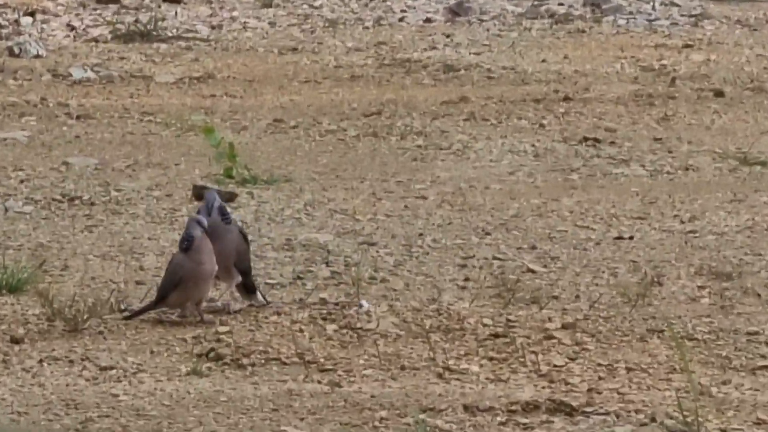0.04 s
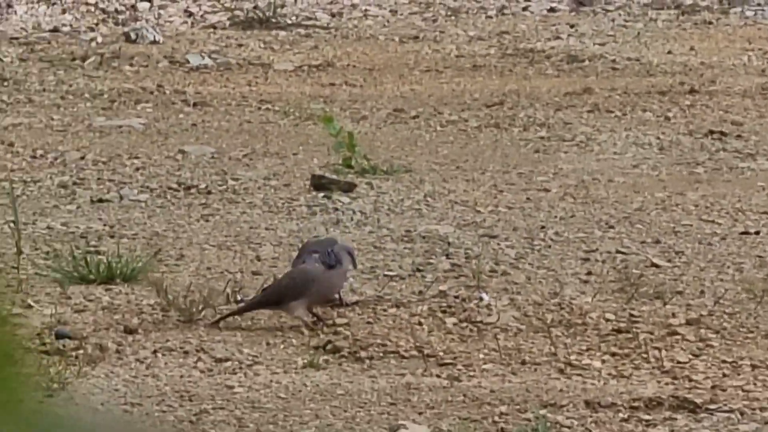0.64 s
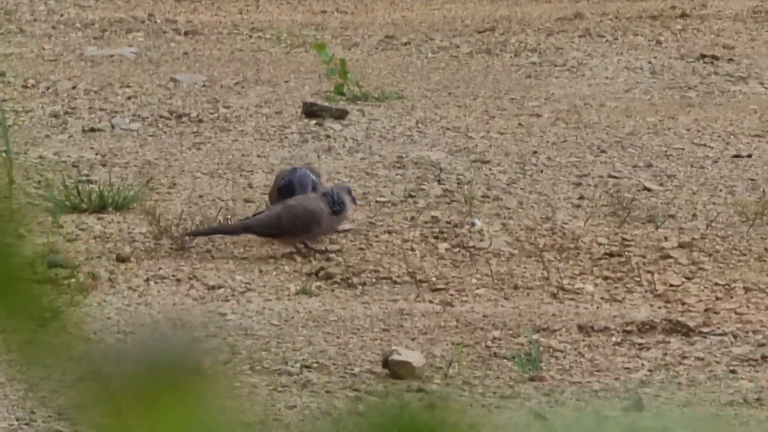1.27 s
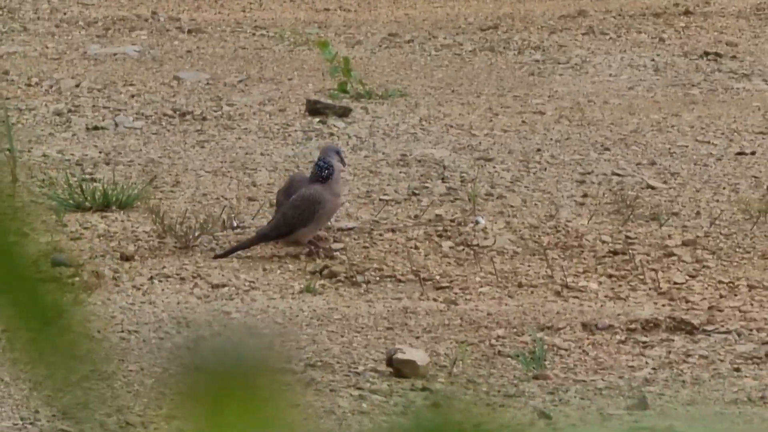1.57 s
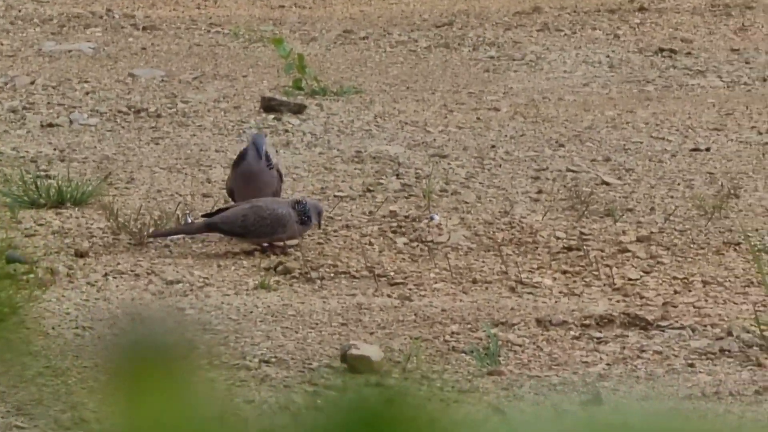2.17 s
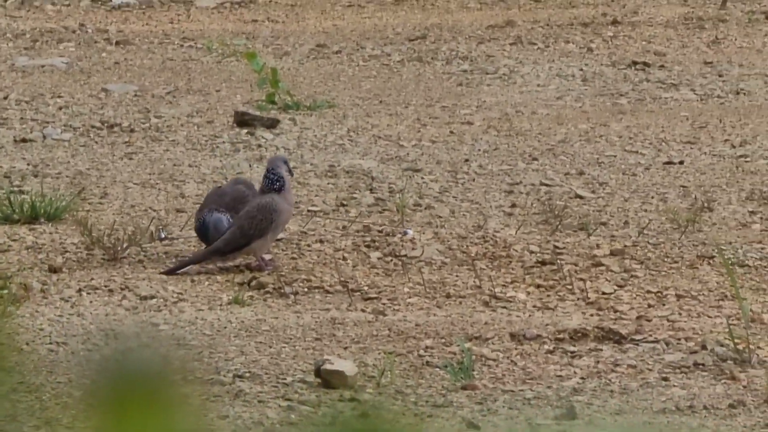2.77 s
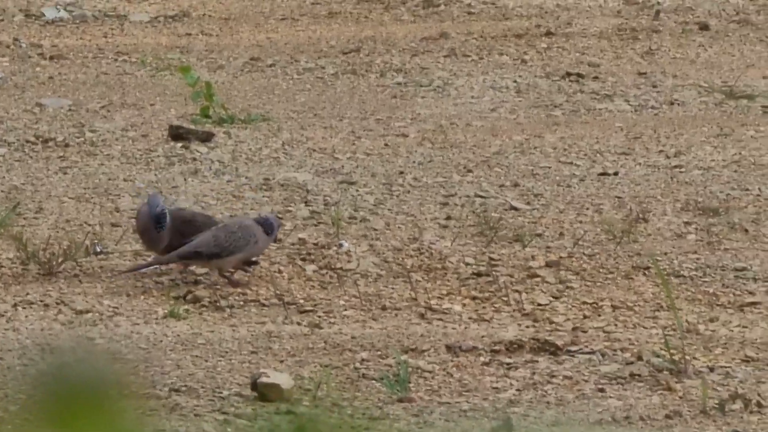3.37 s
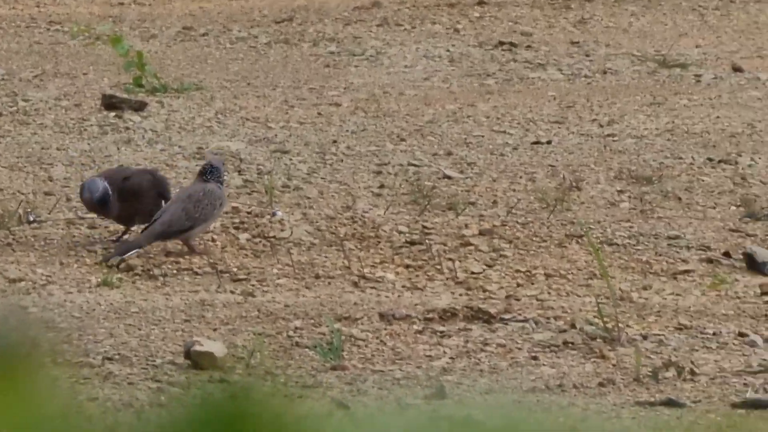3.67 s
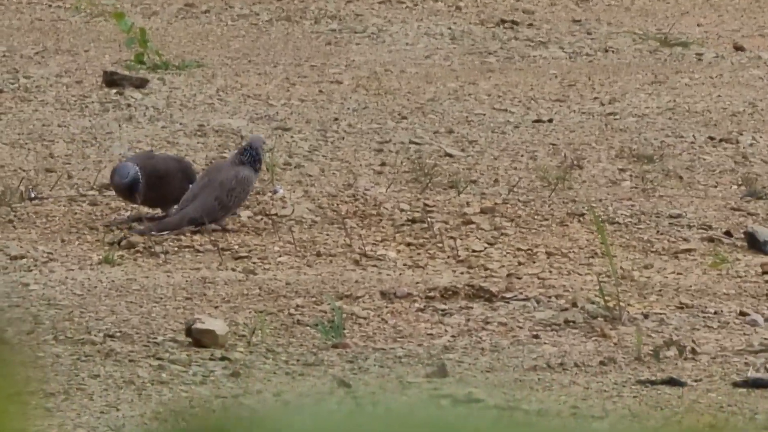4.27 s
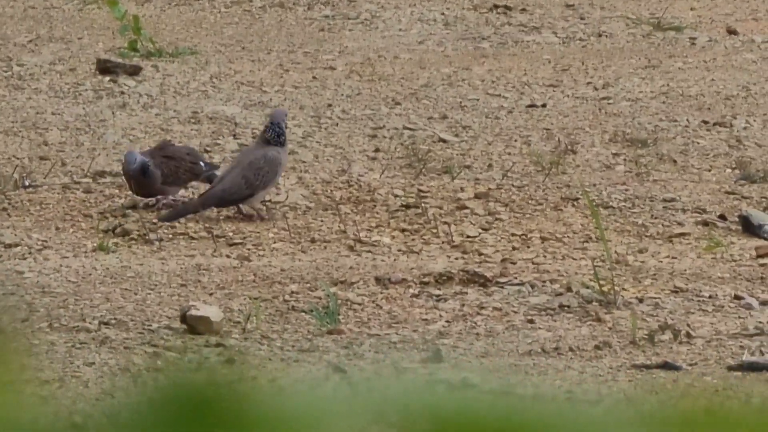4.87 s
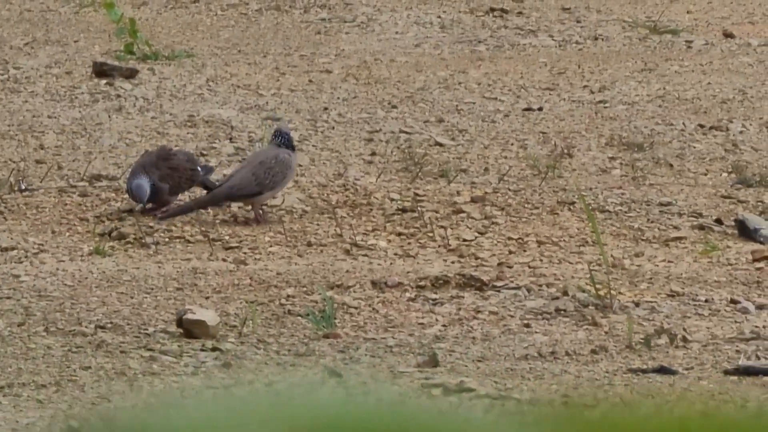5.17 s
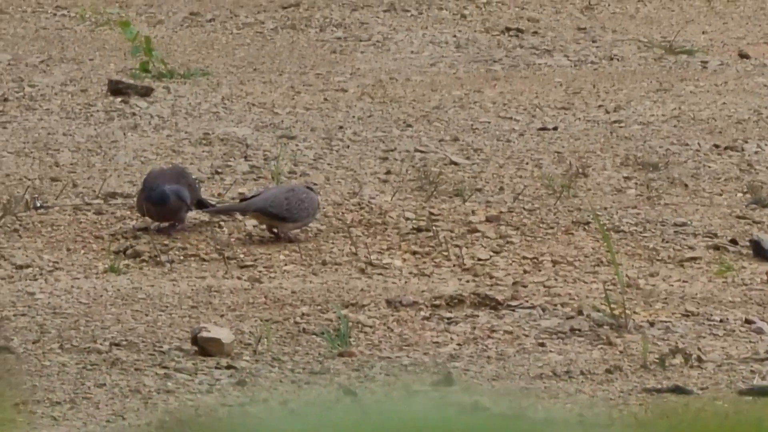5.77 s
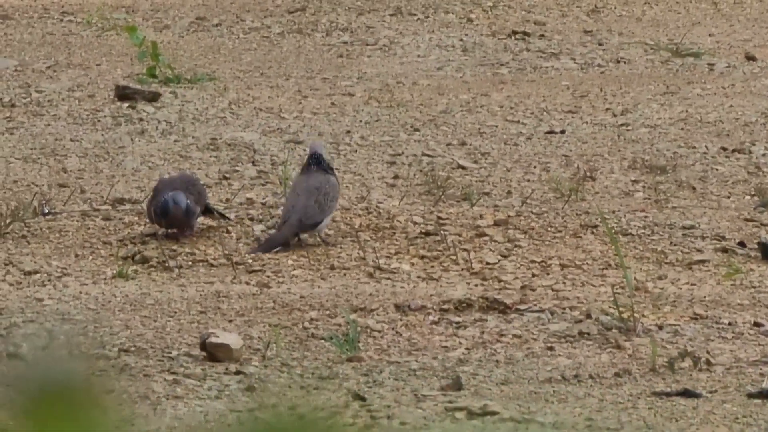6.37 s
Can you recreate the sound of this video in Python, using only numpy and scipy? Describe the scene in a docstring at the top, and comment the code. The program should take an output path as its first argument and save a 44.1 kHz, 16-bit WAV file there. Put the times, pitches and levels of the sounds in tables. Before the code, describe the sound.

A dove gives a quick series of soft coos, short and long, mixed with throaty purrs. After a pause it returns with two scattered groups of purring calls. Dry grit crunches lightly underfoot close to the microphone, and a high, pulsing cricket grows gradually louder. Faint small birds, steady insects and a distant engine hum lie behind in the open air.

```python
"""A dove bows and coos to its mate on open, stony ground: near-sine arches that break into a throaty purr
when the quick swells of its syrinx fall out of step. Dry grit crunches underfoot close by, ringing
small stones, and a bush cricket's wing strokes build to a crescendo. Small birds whistle and twitter
far off, over a bed of steady insects, a distant engine's hum, faint low tones and open air."""
import sys
import numpy as np
from scipy import signal
from scipy.fft import rfft, irfft
from scipy.io import wavfile
from scipy.ndimage import uniform_filter1d

SR = 44100
rng = np.random.default_rng(int(sys.argv[2]) if len(sys.argv) > 2 else 0)


def master_out(mix):
    """Clip the mix to full scale and print it as 16-bit PCM to the path in sys.argv[1]."""
    frames = np.transpose(np.atleast_2d(mix))
    ceiling = np.clip(frames, -1, 1)
    pcm = np.round(ceiling * 32767).astype(np.int16)
    wavfile.write(sys.argv[1], SR, pcm)


N = 283563
TIME = np.arange(N) / SR

# tone colour of the open air: f/Hz, relative level/dB
AIR_SPECTRUM = [(20, -9.5), (35, -15.5), (55, 1), (75, -1.5), (100, -7.5), (150, -16.5), (200, -19.5),
                (300, -26), (600, -28.5), (1300, -34.5), (2300, -30.5), (4500, -34), (7000, -38),
                (10000, -44.5), (15500, -38.5)]
# stereo width of the air: f/Hz, side over mid/dB
AIR_WIDTH = [(60, -14.5), (125, -9.5), (300, -5.5), (1000, -0.5), (10000, 0.5)]
# far low tones: start/s, end/s, f/Hz, level/dB
LOW_TONES = [(0.9, 4.4, 192, -66), (2.55, 2.9, 224.3, -60.5), (4.2, 5.4, 322.6, -69.5)]
# fader moves of the distant engine: t/s, hum level/dB, drone level/dB
ENGINE_LEVELS = [(0, -45, -111), (2.7, -45, -71), (3.6, -47, -64.5), (5.2, -54, -71), (5.8, -47.5, -71),
                 (6.43, -47.5, -74)]
# a far bird's whistles: t/s, length/s, first f/Hz, last f/Hz, level/dB
BIRD_WHISTLES = [(3.91, 0.15, 1160, 1085, -64), (4.3, 0.13, 1116, 1034, -67),
                 (6.255, 0.128, 1163, 1087, -60), (6.385, 0.079, 1094, 1070, -62)]
# a small bird's runs of chips: start/s, end/s, level/dB
BIRD_TWITTERS = [(0.785, 1.15, -68), (2.34, 2.6, -66.5), (3.852, 4.25, -65), (5.47, 5.7, -66.5)]
# the cricket's crescendo, driving both loudness and pitch: t/s, stroke force/dB
CRICKET_FORCE = [(1.76, -75), (2.0, -68), (3.7, -60), (5.25, -51), (5.75, -50), (6.08, -51.5), (6.18, -56)]
# resonances of the small stones: f/Hz, width/Hz, gain/dB
STONE_MODES = [(2300, 450, 3), (2764, 140, 9.5), (3490, 380, 5.5), (3710, 120, 8.5), (3920, 720, 5.5),
               (4770, 49, -3), (5660, 590, -12)]
# the main crunches underfoot: t/s, level/dB, length/s
CRUNCHES = [(0.558, -41.5, 0.0056), (0.567, -43, 0.0087), (0.584, -49.5, 0.012), (0.655, -52.5, 0.0027),
            (.8316, -56, 0.0035), (1.067, -54, 0.0027), (1.213, -51, 0.0025), (1.2465, -50.5, 0.0028),
            (1.8515, -48, 0.0023), (2.1473, -28, 0.002), (2.15, -33.5, 0.0021), (2.179, -53, 0.0059),
            (2.201, -38.5, 0.0024), (3.085, -40, 0.0039), (3.112, -47, 0.0018), (3.145, -47, 0.0021),
            (3.157, -39, 0.0034), (3.164, -39, 0.0041), (3.174, -38, 0.0076), (3.182, -37, 0.0097),
            (3.198, -35, 0.0029), (3.202, -33.5, 0.0032), (3.212, -42.5, 0.0028), (3.2267, -36, 0.0021),
            (3.229, -30, 0.0021), (3.25, -41, 0.004), (3.283, -45.5, 0.0073), (3.299, -50, 0.0038),
            (3.322, -45, 0.0032), (3.3361, -29, 0.0013), (3.339, -40.5, 0.0046), (3.3603, -40, 0.0056),
            (3.648, -50, 0.0031), (3.72, -51.5, 0.0034), (3.7655, -49, 0.0013), (3.901, -43.5, 0.0029),
            (4.293, -48.5, 0.0032), (4.446, -45.5, .003), (4.4644, -47, 0.0077), (5.38, -41.5, 0.0037),
            (5.391, -40.5, 0.003), (5.402, -43, 0.0019), (5.437, -55.5, 0.0049)]
# spells of softer shuffling: middle t/s, half length/s, level/dB
SHUFFLE_SPELLS = [(1.876, 0.13, -63.5), (3.217, 0.16, -56), (3.912, 0.21, -62.5), (4.383, 0.18, -56.5)]
# two pitches the dove's swollen throat favours: f/Hz, width/Hz, lift/dB
THROAT_RESONANCES = [(635, 22.5, 5), (588.6, 21.4, 3.5)]
# what the closed throat lets out: f/Hz, gain/dB
THROAT_EQ = [(300, -5), (420, -9.5), (490, -2.5), (560, 0), (720, 0), (790, -0.5), (900, -4), (1200, 2)]
# clear coos: t/s, length/s, nominal top f/Hz, base level/dB, scoop/s, settling/s, opening push/dB,
# release/s, relative buzz/dB, quaver depth/Hz
COO_CALLS = [(0.347, 0.15, 668, -35, .022, 0.064, -2.5, .005, -20, 2),
             (0.613, 0.38, 715, -34, .033, 0.035, 1, .009, -32, 12),
             (1.384, 0.15, 675, -34.5, 0.03, .07, 3.5, .005, -19, 3),
             (1.641, 0.34, 715, -33, 0.034, 0.049, -0.5, .008, -34.5, 7),
             (2.415, 0.14, 664, -33.5, .033, 0.13, 3.5, .005, -23, 3),
             (2.671, 0.308, 715.6, -33.5, 0.0344, 0.052, -1, .007, -32, 18)]
# throaty purrs: start/s, loudest/s, end/s, base level/dB, peak roughness/0-1, nominal top f/Hz
PURR_CALLS = [(1.091, 1.342, 1.456, -35, 0.72, 609), (1.958, 2.042, 2.12, -35.5, 0.81, 593),
              (2.233, 2.429, 2.5, -36, .9, 618), (3.829, 3.933, 4.046, -36.5, 0.74, 581),
              (4.123, 4.34, 4.385, -34, .95, 634.5), (5.428, 5.536, 5.6, -38, 0.79, 593),
              (5.721, 5.945, 6.15, -34, 0.74, 615)]


def undb(db):
    """Decibels to gain."""
    return 10 ** (np.asarray(db) / 20)


def unit(x):
    """Scale to an rms of one."""
    return x / np.sqrt(np.mean(np.abs(x) ** 2))


def ramp(x):
    """A smooth fade from zero to one."""
    return np.sin(np.pi / 2 * np.clip(x, 0, 1)) ** 2


def arch(start, peak, end):
    """A smooth fade up to one and back down."""
    return ramp(np.interp(TIME, [start, peak, end], [0, 1, 0]))


def curves(table):
    """Each column of a timed table, joined by straight lines."""
    times, *columns = np.transpose(table)
    return [np.interp(TIME, times, column) for column in columns]


def phase(hz):
    """Running phase in radians of a moving pitch."""
    return 2 * np.pi * np.cumsum(hz) / SR


def walk(rate_hz):
    """Smooth random drift with an rms of one."""
    hold = int(SR / rate_hz)
    steps = np.repeat(rng.standard_normal(N // hold + 1), hold)
    return unit(uniform_filter1d(uniform_filter1d(steps, hold), hold)[:N])


def band(x, hz, width_hz):
    """A resonance with gain one at its centre."""
    return signal.lfilter(*signal.iirpeak(hz, hz / width_hz, fs=SR), x)


def noise_band(hz, width_hz, shape=N):
    """Noise sent twice through one resonance, at an rms of one."""
    return unit(band(band(rng.standard_normal(shape), hz, width_hz), hz, width_hz))


def equalise(x, points):
    """Shape a sound by (f/Hz, gain/dB) points."""
    hz, db = np.transpose(points)
    bins = np.maximum(np.fft.rfftfreq(N, 1 / SR), 1)
    return irfft(rfft(x) * undb(np.interp(np.log(bins), np.log(hz), db)), N)


def place(x, pan_db, lag_ms):
    """Pan a source by the level lead and the time lag of the left ear."""
    delay = np.exp(-2j * np.pi * np.fft.rfftfreq(N, 1 / SR) * lag_ms / 1000)
    left = irfft(rfft(x) * delay, N)
    return np.array([left * undb(pan_db / 2), x * undb(-pan_db / 2)])


def ground_echo(x, t60_s, wet_db):
    """A short diffuse tail from ground and bushes, different in each ear."""
    t = TIME[:SR // 2]
    tails = rng.standard_normal((2, len(t))) * np.exp(-np.log(1000) * t / t60_s)
    tails /= np.sqrt(np.sum(tails ** 2, axis=1, keepdims=True))
    return undb(wet_db) * signal.fftconvolve(x[None], tails, axes=1)[:, :N]


def air(db=-47.5, sway_db=0.36):
    """The bed: a centred low rumble under a wide, faint hiss."""
    mid, side = (equalise(rng.standard_normal(N), AIR_SPECTRUM) for _ in range(2))
    side = equalise(side, AIR_WIDTH)
    stereo = np.array([undb(-0.14) * (mid + side), mid - side])
    return undb(db + sway_db * walk(2.72)) * unit(stereo)


def low_tones(waver_hz=1.42):
    """Faint low tones fade in and out in the distance."""
    out = np.zeros(N)
    for start, end, hz, db in LOW_TONES:
        fade = np.sqrt(2 * arch(start, (start + end) / 2, end))
        out += undb(db) * fade * np.sin(phase(hz + waver_hz * walk(11)))
    return out


def engine(hum_hz=70.06, waver_hz=0.664, rumble_db=-19.5):
    """A distant engine hums and rumbles, dipping late on, while a faint higher drone swells and eases."""
    hum_db, drone_db = curves(ENGINE_LEVELS)
    hum = np.sqrt(2) * np.sin(phase(hum_hz + waver_hz * walk(3.965)))
    drone = undb(drone_db) * noise_band(hz=305, width_hz=90)
    rumble = undb(rumble_db) * noise_band(hz=156, width_hz=75)
    low_end = (hum + rumble) * undb(hum_db + 0.74 * walk(7.8))
    return place(low_end + drone, pan_db=2.1, lag_ms=-0.4)


def insects(db=-62, flicker_db=2.5):
    """Far insects merge into one high, flickering band, leaning left."""
    chorus = noise_band(hz=7860, width_hz=450, shape=(3, N)) * undb(flicker_db * walk(35))
    return undb(db) * unit(place(chorus[2], pan_db=14, lag_ms=0.043) + 0.8 * chorus[:2])


def far_birds(chip_period_s=0.056, chip_s=0.0436, chip_hz=6250, chip_fall=0.062):
    """Falling whistles and uneven runs of thin, falling chips, blurred by distance."""
    notes = list(BIRD_WHISTLES)
    for first, last, db in BIRD_TWITTERS:
        starts = np.arange(first, last, chip_period_s)
        for start, (late, high, loud) in zip(starts, rng.standard_normal((len(starts), 3))):
            top_hz = chip_hz * (1 + 0.01244 * high)
            notes.append((start + 0.0059 * late, chip_s, top_hz, top_hz * (1 - chip_fall), db + 2 * loud))
    out, waver = np.zeros(N), .02 * walk(200)
    for start, length, first_hz, last_hz, db in notes:
        span = (TIME >= start) & (TIME < start + length)
        progress = (TIME[span] - start) / length
        hz = first_hz + (last_hz - first_hz) * progress
        hz *= 1 + waver[span] * first_hz / chip_hz  # high notes waver most
        fade = np.sqrt(2 * np.abs(np.sin(np.pi * progress)))
        out[span] += undb(db) * fade * np.sin(phase(hz))
    return out + ground_echo(out, t60_s=.25, wet_db=-5)


def cricket_chirps(start_s=1.722, tires_s=5.38, end_s=6.178, period_s=.109, tired_period_s=.1155):
    """The cricket's rhythm: swelling chirps that slow as it tires, and a gate for the whole song."""
    cycle = (np.minimum(TIME, tires_s) - start_s) / period_s
    cycle += np.maximum(TIME - tires_s, 0) / tired_period_s
    chirps = np.interp(cycle % 1, [0, .05, .24, .38, .6, .7, 1], [.12, .43, .4, .75, .92, .071, .073])
    return chirps, (TIME > start_s) & (TIME < end_s)


def cricket(wing_hz=9280, hz_per_db=21, stroke_hz=135, slide_hz=450):
    """Runs of strokes ring the wing: harder strokes ring higher, and each one slides down in pitch."""
    force_db, = curves(CRICKET_FORCE)
    relative_db = force_db - force_db.max()
    chirps, singing = cricket_chirps()
    stroke_cycle = np.cumsum(stroke_hz * (1 + 0.07 * walk(60))) / SR % 1
    strokes = np.exp(-stroke_cycle / 0.48) * (1 - np.exp(-stroke_cycle / 0.41))
    hz = wing_hz + hz_per_db * relative_db - slide_hz * (stroke_cycle ** 2 - .17)
    ring = np.sqrt(2) * np.sin(phase(hz) + 0.9 * walk(280))
    rasp = unit(band(band(rng.standard_normal(N), 9150, 730), 8800, 820))
    # soft chirps are mostly rasp; loud ones ring
    timbre = ring * undb(force_db + 0.39 * relative_db + 2.5) + rasp * undb(0.42 * relative_db - 57)
    song = unit(chirps * strokes) * singing * timbre
    return place(band(song, 9220, 1400), pan_db=1.0, lag_ms=0.028)


def stone_ring(grains, snap_db=-4.5, crack_db=-22):
    """Grains ring the small stones and add a broad snap with a bright crack."""
    ring = sum((-1) ** k * undb(db) * band(grains, hz, width)
               for k, (hz, width, db) in enumerate(STONE_MODES))
    snap = undb(snap_db) * band(grains, 2230, 2660)
    crack = undb(crack_db) * band(grains, 11400, 7600)
    return band(ring, 3240, 5300) + snap + crack


def grit_ticks(gap_s=0.28, db=-58, spread_db=7.5, length_s=0.002):
    """Faint crunches at uneven intervals, as rows of t/s, level/dB, length/s."""
    slots = np.arange(0, TIME[-1], gap_s)
    rows = [(slot + gap_s * late, db + spread_db * (2 * loud - 1), length_s)
            for slot, (late, loud) in zip(slots, rng.random((len(slots), 2)))]
    return [row for row in rows if row[0] < TIME[-1] - .1]


def grit_grains(count, spread_db, cap):
    """Three channels of spiky noise: many small grains and a few big ones."""
    return rng.standard_normal((3, count)) * undb(spread_db * np.minimum(rng.exponential(size=count), cap))


def grit(tail_s=0.014, rustle_db=-92, diffuse_db=1.5):
    """Each crunch underfoot is a short, dense run of grains; a sparser rustle goes on between them."""
    out, t = np.zeros((3, N)), TIME[:SR // 15]
    for start, db, length in list(CRUNCHES) + grit_ticks():
        envelope = np.exp(-(t / length) ** 2) + 0.14 * np.exp(-t / tail_s)
        crunch = stone_ring(grit_grains(len(t), spread_db=5, cap=4) * envelope)
        energy = np.sum(crunch ** 2, axis=1, keepdims=True)
        i = int(start * SR)
        out[:, i:i + len(t)] += crunch * undb(db) * np.sqrt(length * SR / energy)
    rustle = unit(stone_ring(grit_grains(N, spread_db=7, cap=6)))
    shuffles = sum(undb(db) * np.exp(-((TIME - middle) / half) ** 2) for middle, half, db in SHUFFLE_SPELLS)
    out += rustle * (undb(rustle_db) + shuffles)
    # one channel arrives direct; the other two are scattered by the ground, one to each ear
    return place(out[2], pan_db=2.5, lag_ms=-.22) + undb(diffuse_db) * out[:2]


def coo(start, length, top_hz, db, scoop_s, settle_s, push_db, release_s, buzz_db, quaver_hz,
        scoop_hz=213.3, sag_hz_per_s2=1150, slack_hz=370, quaver_rate_hz=21.8,
        attack_s=0.025, push_s=0.024, onset_rough=0.445, clear_rough=.09):
    """A coo scoops up hoarse, quavers and clears, swells as it sags into resonance, then collapses."""
    t = np.clip(TIME - start, 0, 2 * length)
    hz = top_hz - scoop_hz * np.exp(-(t / scoop_s) ** 2) - sag_hz_per_s2 * t ** 2
    hz += quaver_hz * np.sin(2 * np.pi * quaver_rate_hz * t) * np.exp(-(t / 0.23) ** 2)
    lift_db = sum(lift * np.exp(-((hz - centre) / width) ** 2) for centre, width, lift in THROAT_RESONANCES)
    lift_db *= ramp(t / (settle_s + scoop_s)) ** 2
    push = np.exp(-(2 * (t / push_s - 1)) ** 2)
    release = np.exp(1 - np.hypot(np.maximum(TIME - start - length, 0) / release_s, 1))
    effort = undb(db + lift_db + push_db * push) * ramp(t / attack_s) ** 0.78 * release
    hz = slack_hz + (hz - slack_hz) * release ** 0.41  # the pitch drops off at the end
    rough = onset_rough + (clear_rough - onset_rough) * ramp(2 * t / settle_s - 1)
    return effort, hz, rough, undb(buzz_db)


def purr(start, loudest, end, db, rough, top_hz, fade_s=.055, hz_per_db=7.5, rest_hz=497, buzz_db=-17.5):
    """A purr is one arch of effort; pitch and roughness rise and fall with it."""
    edges = ramp(np.minimum(TIME - start, end - TIME) / fade_s) ** 0.672
    swell = arch(start, loudest, end) ** 0.185 * edges
    hz = top_hz + hz_per_db * 20 * np.log10(swell + 1e-9)
    return undb(db) * swell, np.maximum(hz, rest_hz), rough * swell ** 0.124, undb(buzz_db)


def dove_phrasing():
    """One voice makes every call: where two overlap, the stronger leads pitch, roughness and buzz."""
    calls = [coo(*row) for row in COO_CALLS] + [purr(*row) for row in PURR_CALLS]
    effort = sum(call[0] for call in calls) + 1e-9
    hz, rough, buzz = (sum(call[0] * call[k] for call in calls) / effort for k in (1, 2, 3))
    return effort, hz, rough, buzz


def syrinx_flutter(rough, rate_hz=124, swell_s=0.01706, slowing=.21, jitter=0.195, slip_rad=1.23,
                   spread_db=2.5, kick_hz=240, kick_s=0.0033):
    """The syrinx sounds in quick overlapping swells: in step they fuse into a coo, out of step they purr."""
    flutter, start, t = np.zeros(N + SR, complex), 0, TIME[:SR // 40]
    # a rough swell is shorter and starts sharp, then falls back to the pitch
    kick_rad = -2 * np.pi * kick_hz * kick_s * np.exp(-t / kick_s)
    for late, size, shift in rng.standard_normal((N // 200, 3)):
        i = int(start * SR)
        if i >= N:
            break
        length = swell_s * (1 - 0.16 * rough[i])
        swell = np.sin(np.pi * np.minimum(t / length, 1)) ** 2 * undb(spread_db * rough[i] * size)
        offset_rad = rough[i] ** 0.89 * (slip_rad * shift + kick_rad)
        flutter[i:i + len(t)] += swell * np.exp(1j * offset_rad)
        start += (1 + rough[i] * (slowing + jitter * np.clip(late, -2, 2))) / rate_hz
    # steady air pressure evens out the power over a few swells
    power = uniform_filter1d(np.abs(flutter[:N]) ** 2, SR // 36)
    return flutter[:N] / np.sqrt(power + 1e-9)


def split_voice(start=0.81, end=.99, top_hz=524, db=-39.5, scoop_hz=130, scoop_s=0.0222, waver_hz=9):
    """Late in the first long coo the voice splits: a lower note slides in and beats with the main one."""
    hz = top_hz - scoop_hz * np.exp(-np.maximum(TIME - start, 0) / scoop_s) + waver_hz * walk(70)
    swell = np.sqrt(arch(start, (start + end) / 2, end))
    return undb(db) * swell * np.exp(1j * phase(hz))


def dove(pull_hz=35, rough_sag_hz=41.88, waver_hz=4.2, side_hz=116,
         husk_db=-24, break_db=11, overtone_db=-54):
    """The fluttering syrinx tone, with a buzz above and a husk below, sounds through the closed throat."""
    effort, hz, rough, buzz = dove_phrasing()
    flutter = syrinx_flutter(rough)
    # each swell tightens the membrane and pulls the pitch up; roughness slackens it
    hz = hz + pull_hz * (np.abs(flutter) - 1) - rough_sag_hz * rough ** 2 + waver_hz * walk(55)
    tone = flutter * np.exp(1j * phase(hz))
    # the husk is strongest where the voice is about to break
    breaking = np.exp(-((rough - .42) / 0.16) ** 2)
    husk = undb(husk_db + break_db * breaking)
    beat = np.exp(1j * phase(side_hz * (1 + 0.0804 * walk(60))))
    side_tones = tone * (buzz * beat + husk / beat)
    syrinx = effort * (tone + side_tones + undb(overtone_db) * tone ** 2) + split_voice()
    voice = equalise(np.sqrt(2) * syrinx.real, THROAT_EQ)
    return place(voice, pan_db=-0.75, lag_ms=0.012) + ground_echo(voice, t60_s=.16, wet_db=-18)


def scene():
    """The mix: dove up front, grit and cricket close by, the rest far behind."""
    return dove() + grit() + cricket() + far_birds() + insects() + engine() + low_tones() + air()


def record(dry, cutoff_hz=15800):
    """A steep low-pass trims the very top of the mix."""
    return signal.sosfilt(signal.ellip(8, .2, 70, cutoff_hz, fs=SR, output="sos"), dry)


dry = scene()
out = record(dry)
master_out(out)
```